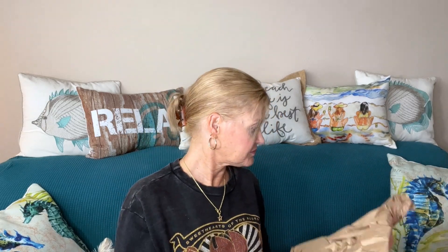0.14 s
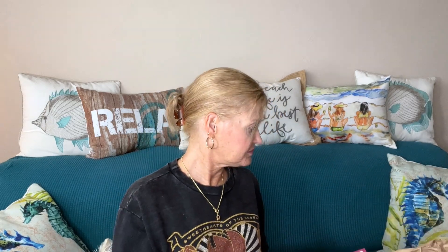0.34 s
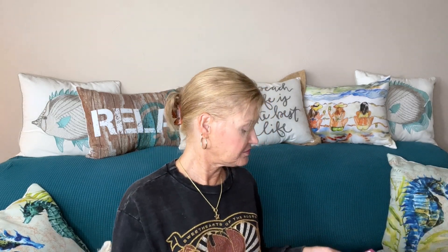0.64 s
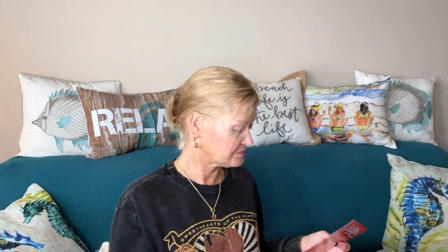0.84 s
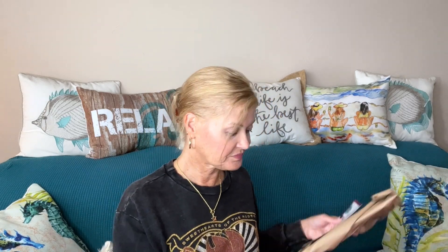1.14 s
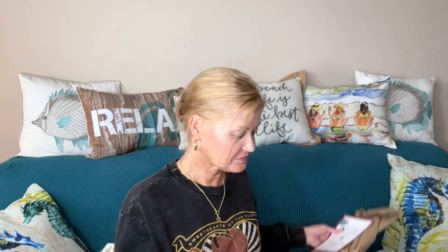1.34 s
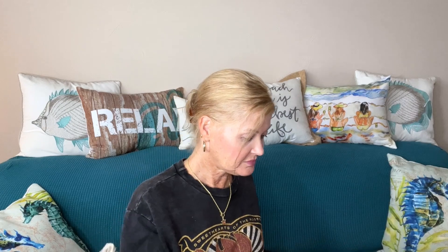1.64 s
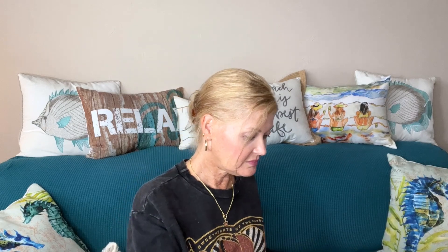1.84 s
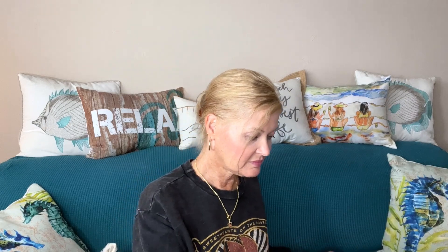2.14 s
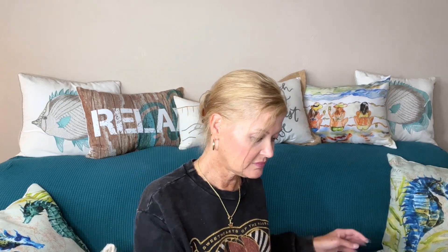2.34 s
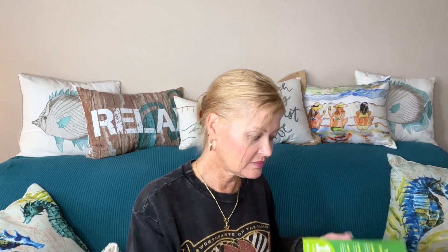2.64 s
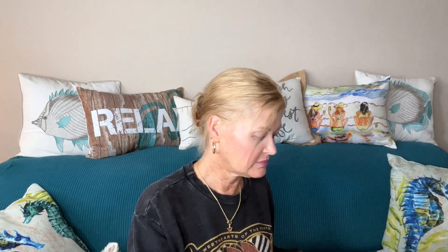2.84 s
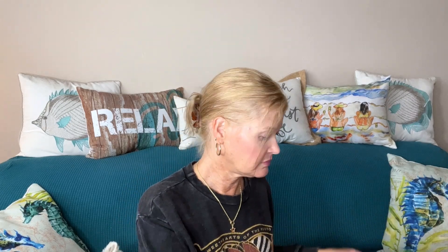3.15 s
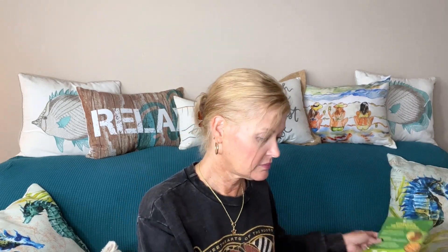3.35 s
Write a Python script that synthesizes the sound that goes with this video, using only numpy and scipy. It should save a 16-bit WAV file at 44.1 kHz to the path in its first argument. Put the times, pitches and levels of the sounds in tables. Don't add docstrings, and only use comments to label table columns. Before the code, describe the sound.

Paper crinkling with sharp cracks and dull box knocks as someone rummages in a small room

```python
import sys
import numpy as np
from scipy import signal
from scipy.fft import rfft, irfft
from scipy.io import wavfile
from scipy.ndimage import map_coordinates

SR = 44100
rng = np.random.default_rng(int(sys.argv[2]) if len(sys.argv) > 2 else 0)


def gain_from_decibels(decibels):
    exponent = np.asarray(decibels, float) / 20
    return 10 ** exponent


def digitize_waveform(pressure):
    field = np.atleast_2d(pressure).T
    bounded = np.clip(field, -1, 1)
    quanta = np.round(bounded * 32767).astype(np.int16)
    wavfile.write(sys.argv[1], SR, quanta)


N = 154350

# (time [s], swell [s], hold [s], level [dB], brightness [dB per octave])
HAND_STROKES = [(0.0, 0.0017, 0.004, -38, 1), (0.118, 0.0016, 0.044, -38.5, 0),
                (0.158, 0.0056, 0.046, -35, -0.9), (0.227, 0.0044, 0.044, -42, 0.5),
                (0.275, 0.027, 0.027, -43, 3), (0.381, 0.044, 0.28, -42, 6),
                (0.474, 0.012, 0.051, -40, -0.2), (0.632, 0.033, 0.043, -63, 4.5),
                (0.949, 0.047, 0.12, -42, 6.5), (1.001, 0.025, 0.043, -29, 2),
                (1.082, 0.0016, 0.036, -39.5, 3.5), (1.161, 0.04, 0.017, -39, 3),
                (1.35, 0.0089, 0.012, -56.5, -11), (1.526, 0.0054, 0.01, -39, 1.5),
                (1.545, .003, .045, -40, 2), (1.593, .003, 0.089, -44, 4.5),
                (1.723, .02, 0.071, -41.5, 0.5), (1.976, 0.0014, 0.0214, -40.5, 0.5),
                (2.105, .02, .04, -53.5, 6), (2.213, 0.0044, 0.021, -44, 1.5),
                (2.787, .002, 0.014, -42.5, 1.5), (0.973, .003, .03, -37.5, 3),
                (1.671, 0.0021, 0.067, -39.5, 2.1), (1.846, 0.0022, 0.036, -46.5, 2.5),
                (1.951, 0.0036, 0.032, -43.5, 0), (1.998, 0.0075, 0.035, -35.5, -1),
                (2.143, 0.001, 0.107, -34, -5), (2.051, 0.0035, 0.033, -40, 0),
                (2.649, 0.055, 0.034, -46, 2.8), (2.738, 0.012, 0.056, -50, 7),
                (2.821, 0.0051, 0.025, -35.5, -4.5), (3.053, 0.042, 0.045, -38.5, 1.1),
                (3.175, 0.0013, 0.047, -52, 1.1)]
# (time [s], level [dB])
HEAP_SETTLING = [(0, -66), (.6, -67.5), (.8, -71), (.92, -90), (1.25, -72), (1.5, -75.5), (1.9, -57),
                 (2.3, -76), (2.4, -66), (2.62, -82.5), (2.8, -78.5), (3.0, -83.5), (3.25, -67.5),
                 (3.38, -69), (3.45, -78), (3.5, -60.5)]
# (frequency [Hz], level per Hz [dB])
PAPER_SPECTRUM = [(170, -23), (300, -3.5), (600, 2), (1200, -4.5), (2500, 2.5), (5000, -12), (7000, -6.5),
                  (8800, -8)]
# (frequency [Hz], level per Hz [dB])
AIR_SPECTRUM = [(20, -4), (60, 6), (100, 7.5), (200, -11.5), (500, -19), (1500, -30), (5000, -38.5),
                (9000, -47)]
# (frequency [Hz], level [dB], wavering [dB])
HUM_PARTIALS = [
    (121.3, -66.5, -0.5),
    (303, -75, 1),
]
# (time [s], peak level [dB], ring [Hz], ring t60 [s])
CREASE_SNAPS = [(0.119, -24, 686, 0.15), (0.161, -11, 1870, 0.019), (0.172, -10, 1046, 0.057),
                (0.242, -24.5, 1370, 0.045), (0.391, -23, 2800, 0.045), (0.419, -22, 3950, 0.093),
                (0.488, -19, 4670, 0.19), (0.595, -38, 1030, 0.24), (0.972, -33.5, 5260, 0.045),
                (1.018, -20, 1300, 0.05), (1.052, -20, 2100, 0.05), (1.102, -11.5, 1540, 0.02),
                (1.355, -19.5, 2700, 0.036), (1.533, -19.5, 750, 0.03), (1.553, -33.5, 3050, 0.067),
                (1.599, -23, 611, 0.034), (1.677, -8, 1500, 0.041), (1.853, -33.5, 990, 0.091),
                (1.868, -26, 730, 0.041), (1.956, -32.5, 1210, 0.073), (1.982, -21.5, 1260, 0.1),
                (2.149, -14, 1090, 0.06), (2.216, -35.5, 855, 0.05), (2.688, -31.5, 1180, 0.05),
                (2.717, -22, 1230, 0.028), (2.759, -31.5, 2940, 0.05), (2.786, -18.5, 1260, 0.03),
                (2.824, -12.5, 745, 0.069), (3.114, -21.5, 1690, 0.055), (3.182, -26, 1920, 0.062)]
# (time [s], peak level [dB], centre [Hz], t60 [s])
FOLD_CRACKS = [(0.120, -20, 1500, 0.036), (0.163, -13, 3500, .015), (0.283, -41, 1460, 0.024),
               (0.313, -38, 2640, .04), (0.487, -22, 2500, .03), (0.959, -37, 5070, 0.024),
               (0.970, -28.5, 3020, .04), (1.030, -25.5, 920, 0.037), (1.061, -17, 1200, 0.021),
               (1.103, -15.5, 4060, .02), (1.113, -18, 2000, 0.038), (1.176, -21.5, 1200, 0.056),
               (1.191, -10.5, 2500, .04), (1.552, -25, 2000, .03), (1.678, -14.5, 3000, .02),
               (1.731, -26.5, 1710, .03), (1.954, -25, 4500, 0.028), (2.000, -29, 1530, 0.042),
               (2.051, -26, 3500, 0.069), (2.159, -15.5, 1190, .04), (2.216, -25, 1670, 0.045),
               (2.429, -21, 4500, 0.019), (2.656, -27, 6000, .03), (2.689, -16, 2500, 0.019),
               (2.787, -27, 2500, .015), (3.054, -47, 2000, .03), (3.068, -18.5, 1000, 0.043),
               (3.095, -42.5, 3900, 0.031)]
# (time [s], peak level [dB], ring [Hz], ring t60 [s])
WALL_BUMPS = [(0.136, -28, 460, 0.12), (1.024, -31, 352, 0.14), (1.356, -38.5, 530, 0.075),
              (1.585, -32, 343, 0.15), (1.578, -26, 570, 0.074), (1.75, -24, 660, 0.043),
              (1.874, -36.5, 144, 0.072), (2.053, -30, 508, 0.34), (2.126, -24.5, 297, 0.34),
              (2.154, -42.5, 812, 0.14), (2.204, -19.5, 548, 0.06), (2.654, -38.5, 592, 0.18),
              (2.664, -27.5, 316, 0.53), (2.822, -11.5, 694, 0.052), (3.067, -19.5, 460, 0.069),
              (3.078, -18, 283, 0.046)]
# (time [s], peak level [dB], ring [Hz], ring t60 [s])
CARD_TAPS = [
    (2.429, -19, 1980, 0.14),
    (2.429, -30.5, 3600, 0.04),
    (1.016, -24, 11000, .05),
    (1.025, -25, 13000, 0.03),
]
# (time [s], peak level [dB], ring [Hz], ring t60 [s])
BOX_THUDS = [
    (1.362, -33, 165, 0.14),
    (1.57, -53.5, 110, .15),
    (2.15, -35.5, 119, .2),
    (2.68, -39, 135.4, .2),
    (3.075, -36, 128, .2),
]
# (time [s], peak level [dB], centre [Hz], t60 [s])
WAD_KNOCKS = [
    (1.531, -32, 800, .03),
    (1.599, -20, 630, .04),
    (1.68, -16, 1450, 0.046),
    (2.786, -21.5, 700, .04),
    (2.825, -10.5, 900, .015),
    (2.834, -10.5, 1240, .04),
    (2.850, -31.5, 695, .05),
]
# (time [s], peak level [dB], centre [Hz], t60 [s])
REST_TICKS = [
    (3.274, -38, 1084, 0.06),
    (3.327, -37.5, 2160, 0.06),
    (3.372, -40.5, 5200, 0.05),
]
# (time [s], length [s], level [dB], frequency [Hz])
SHEEN_GLINTS = [(0.19, 0.035, -6.5, 14200), (0.322, .03, 1, 14500), (0.423, 0.023, 0, 15200),
                (0.452, 0.044, 5, 14140), (0.98, .02, 1.5, 15200), (1.061, .02, 4.5, 15840),
                (1.193, .03, -6, 14100), (1.698, 0.016, 6, 14600), (1.74, 0.035, 2, 15500),
                (2.003, .02, -1, 15100), (2.195, .05, -7, 15600)]

SWELL_DEPTH_DB, RELEASE_DB_PER_S, SAG_DB_PER_S, TREBLE_FADES_FASTER = 28.5, 439.5, 37, 0.089
GRAINS_PER_S, GRAIN_SPREAD_DB, GRAIN_CYCLES = 5000, 3.5, 6.36
HISS_DB, CLUMP_DB, PATCH_DB = -4.5, 1.9, 4
AIR_DB = -71.5
ROOM_DB, ROOM_T60_S, ROOM_CUT_HZ = -5.5, 0.14, 13400
BLOW, JOLT, CRACK_T60_S = 4.35, 4, 0.012
LEFT_DB, PAN_WANDER_DB = -2.5, 4
PAPER_LAG_S, BOX_LAG_S, LAG_WANDER_S = 0.00018, 0.00018, 0.00004
MIC_LOW_HZ, MID_TOP_HZ, NOTCH_HZ = 125, 9188, 7300
TREBLE_HZ, TREBLE_DB = 6325, -10
SHEEN_HZ, SHEEN_DB = 13500, -12
SIDE_TOP_HZ, SIDE_SHEEN_DB = 11200, -14


def rms_one(x):
    return x / np.sqrt(np.mean(x ** 2) + 1e-20)


def at_hz(points, hz):
    table_hz, db = np.array(points).T
    return np.interp(np.log(hz), np.log(table_hz + 1), db)


def drift(rate):
    r = np.exp(-64 * np.pi * rate / SR)
    noise = rng.standard_normal(N // 32 + 1002)
    slow = signal.lfilter([1], [1, -2 * r, r * r], noise)[1000:]
    return np.interp(np.arange(N) / 32, np.arange(len(slow)), rms_one(slow))


def ring(x, hz, t60):
    r, w = gain_from_decibels(-60 / (t60 * SR)), 2 * np.pi * hz / SR
    return signal.lfilter([1, 0, -1], [1, -2 * r * np.cos(w), r * r], x + 1e-18)


def colour(x, points):
    hz = np.fft.rfftfreq(x.shape[-1], 1 / SR) + 1
    return irfft(rfft(x) * gain_from_decibels(at_hz(points, hz)), x.shape[-1])


def rustle():
    t = np.arange(0, N + 32, 32) / SR
    start, swell, hold, db, tilt_db = np.transpose(HAND_STROKES)[:, :, None]
    rise = -SWELL_DEPTH_DB * np.clip(1 - (t - start) / np.maximum(swell, 0.001), 0, 9) ** 2
    sag = SAG_DB_PER_S * np.maximum(t - start - swell, 0)
    fall = RELEASE_DB_PER_S * np.maximum(t - start - swell - hold, 0) + sag
    settling = gain_from_decibels(2 * np.interp(t, *np.transpose(HEAP_SETTLING)))

    clump = drift(45)
    born = rng.random(N) < GRAINS_PER_S * gain_from_decibels(CLUMP_DB * clump) / SR
    size = gain_from_decibels(GRAIN_SPREAD_DB * np.minimum(rng.exponential(1, N), 3))
    grains = born * size * rng.choice([-1, 1], N)
    dealt = rng.integers(0, 24, N)
    white = rng.standard_normal((2, N))
    out = 0
    for k, hz in enumerate(np.geomspace(170, 8800, 24)):
        octaves = np.log2(hz / 1500)
        fade = fall * (4.5 + TREBLE_FADES_FASTER * octaves)
        power = gain_from_decibels(2 * (db + rise + tilt_db * octaves - fade)).sum(axis=0) + settling
        gain = np.interp(np.arange(N) / SR, t, np.sqrt(power))
        buckles = rms_one(ring(grains * (dealt == k), hz, GRAIN_CYCLES / hz))
        hiss = rms_one(ring(white[k % 2], hz, 12.8 / hz))
        level = gain_from_decibels(at_hz(PAPER_SPECTRUM, hz) + PATCH_DB * drift(12)) * np.sqrt(hz / 1500)
        out = out + (buckles + gain_from_decibels(HISS_DB) * hiss) * gain * level
    return out * gain_from_decibels(CLUMP_DB * 0.5 * clump - 6)


def background():
    air, t = rng.standard_normal((3, N)), np.arange(N) / SR
    hum = 0
    for hz, db, waver_db in HUM_PARTIALS:
        level = gain_from_decibels(db + 1 + waver_db * drift(2.1))
        hum = hum + level * np.sin(2 * np.pi * hz * t + waver_db / 4 * drift(10))
    return gain_from_decibels(AIR_DB) * rms_one(colour(air[0] + 0.6 * air[1:], AIR_SPECTRUM)) + hum


def room(x):
    t, hop, out = np.arange(SR // 4) / SR, SR // 10, np.zeros((2, N + SR))
    shape = gain_from_decibels(-60 * t / ROOM_T60_S) * np.clip(t / 0.0059 - 0.3, 0, 1)
    x = np.pad(x, (hop, 2 * hop))
    x = signal.lfilter([1], [1, -np.exp(-2 * np.pi * ROOM_CUT_HZ / SR)], x)
    for i in range(0, N + hop, hop):
        piece = x[i:i + 2 * hop] * np.hanning(2 * hop)
        tails = rng.standard_normal((2, len(t))) * shape
        wet = signal.fftconvolve([piece], tails, axes=1)
        out[:, i:i + wet.shape[1]] += wet
    return out[:, hop:hop + N] / np.sqrt((shape ** 2).sum())


def hits(table, width, rise_s, crack_db):
    out, t = np.zeros(N + SR), np.arange(SR // 3) / SR
    for s, db, hz, t60 in table:
        push = rng.standard_normal((2, len(t)))
        strength = gain_from_decibels(-60 * t / max(t60, 0.01)) + BLOW * np.exp(-t / (3 * rise_s))
        force = push[0] * strength * np.minimum(t / rise_s, 1)
        force[int(rise_s * SR)] += JOLT * np.sqrt(SR / hz)
        mode_t60 = 1.4 / (width * hz)
        body = ring(ring(force, hz, mode_t60), hz, mode_t60)
        crack = signal.lfilter([1, -1], [1, -1.5, 0.54], push[1] * gain_from_decibels(-60 * t / CRACK_T60_S))
        hit = body / np.abs(body).max() + gain_from_decibels(crack_db) * crack / np.abs(crack).max()
        i = int(s * SR)
        out[i:i + len(t)] += gain_from_decibels(db) * hit
    return out[:N]


def crease_snaps():
    return hits(CREASE_SNAPS, width=0.35, rise_s=0.00045, crack_db=-4)


def fold_cracks():
    return hits(FOLD_CRACKS, width=0.89, rise_s=0.00034, crack_db=-8.5)


def wall_bumps():
    return hits(WALL_BUMPS, width=0.35, rise_s=0.003025, crack_db=-14)


def card_taps():
    return hits(CARD_TAPS, width=0.15, rise_s=0.00057, crack_db=-12.5)


def box_thuds():
    return hits(BOX_THUDS, width=0.37, rise_s=0.014, crack_db=-49.5)


def wad_knocks():
    return hits(WAD_KNOCKS, width=0.75, rise_s=0.00074, crack_db=-26.5)


def rest_ticks():
    return hits(REST_TICKS, width=0.51, rise_s=0.00014, crack_db=-0.72)


def later(x, lag_s):
    return map_coordinates(x, [np.arange(N) - lag_s * SR], order=3)


def scene():
    paper = rustle() + crease_snaps() + fold_cracks() + card_taps() + wad_knocks() + rest_ticks()
    box = wall_bumps() + box_thuds()
    pan = gain_from_decibels(PAN_WANDER_DB * drift(1.1) / 2)
    paper_left = pan * later(paper, PAPER_LAG_S + LAG_WANDER_S * drift(6.6))
    left = gain_from_decibels(LEFT_DB) * (paper_left + later(box, BOX_LAG_S))
    right = paper / pan + box
    return np.array([left, right]) + gain_from_decibels(ROOM_DB) * room(paper + box) + background()


def band_limit(x):
    return signal.sosfilt(signal.butter(12, 16250, fs=SR, output="sos"), x)


def record(dry):
    x = signal.sosfilt(signal.butter(2, MIC_LOW_HZ, "high", fs=SR, output="sos"), dry)
    dull = signal.lfilter(*signal.butter(2, TREBLE_HZ, fs=SR), x)
    x = gain_from_decibels(TREBLE_DB) * x + (1 - gain_from_decibels(TREBLE_DB)) * dull
    x = 0.25 * x + 0.75 * signal.lfilter(*signal.iirnotch(NOTCH_HZ, 14, SR), x)
    mid, side = (x[0] + x[1]) / 2, (x[0] - x[1]) / 2

    top = signal.sosfilt(signal.butter(6, SHEEN_HZ * 0.9, "high", fs=SR, output="sos"), mid)
    mid_sheen = 0
    for s, length, db, hz in SHEEN_GLINTS:
        window = np.exp(-((np.arange(N) / SR - s) / length) ** 4)
        mid_sheen = mid_sheen + gain_from_decibels(db - 46) * ring(ring(top * window, hz, 0.005), hz, 0.005)
    mid = signal.sosfilt(signal.ellip(10, 1, 70, MID_TOP_HZ, fs=SR, output="sos"), mid)
    mid = mid + gain_from_decibels(SHEEN_DB) * mid_sheen

    side_sheen = signal.sosfilt(signal.butter(6, SIDE_TOP_HZ, "high", fs=SR, output="sos"), side)
    side = side + 0.9 * signal.lfilter(*signal.butter(2, 8500, "high", fs=SR), side)
    side = signal.sosfilt(signal.cheby2(8, 45, SIDE_TOP_HZ * 1.06, fs=SR, output="sos"), side)
    side = side + gain_from_decibels(SIDE_SHEEN_DB) * side_sheen * np.clip(drift(9), 0, 1.5) ** 2
    return band_limit(np.array([mid + side, mid - side]))


dry = scene()
out = record(dry)
digitize_waveform(out)
```